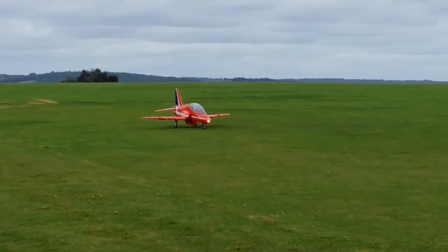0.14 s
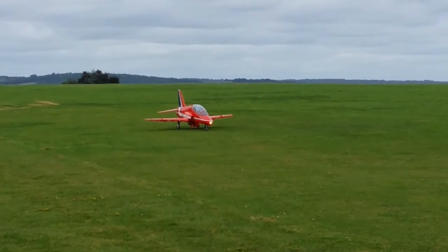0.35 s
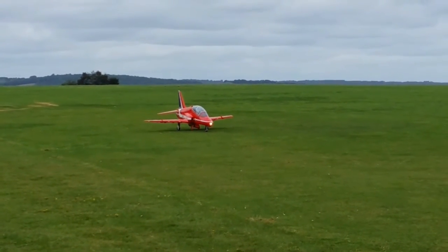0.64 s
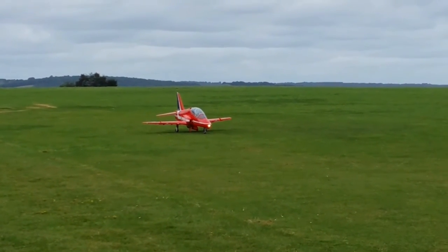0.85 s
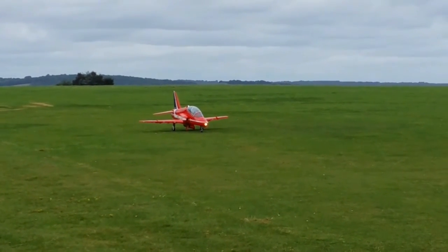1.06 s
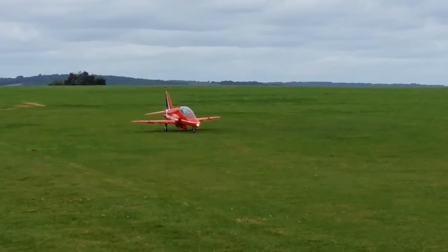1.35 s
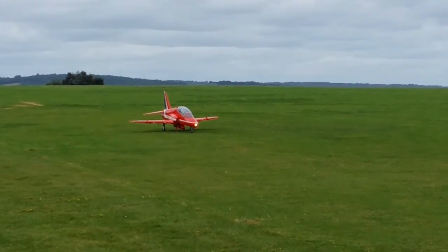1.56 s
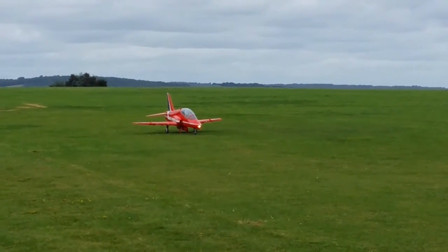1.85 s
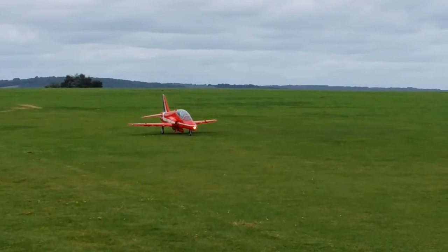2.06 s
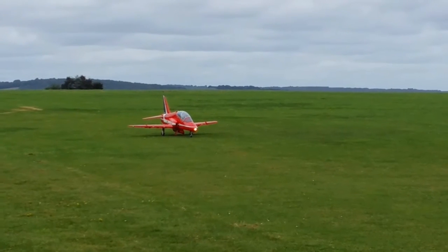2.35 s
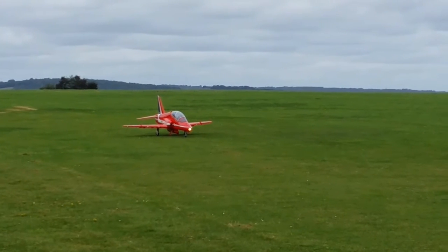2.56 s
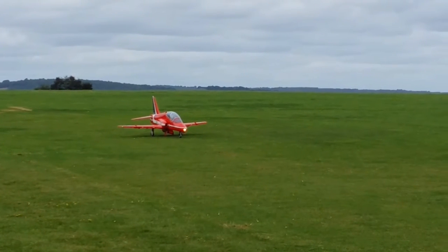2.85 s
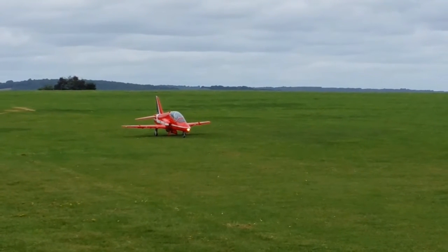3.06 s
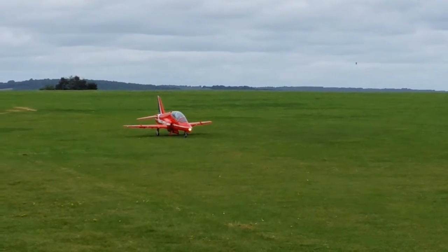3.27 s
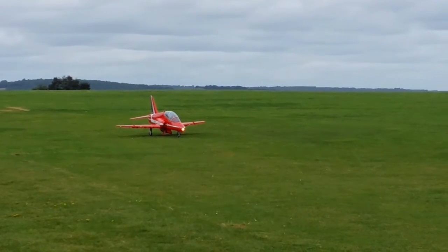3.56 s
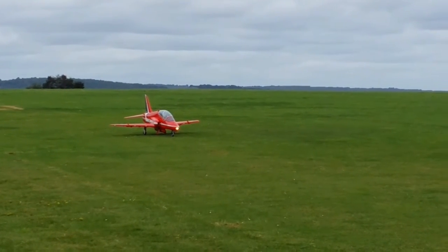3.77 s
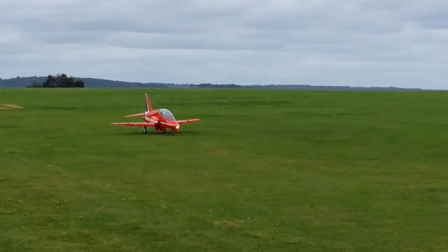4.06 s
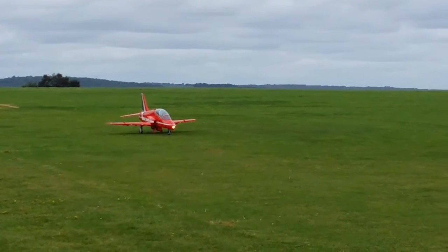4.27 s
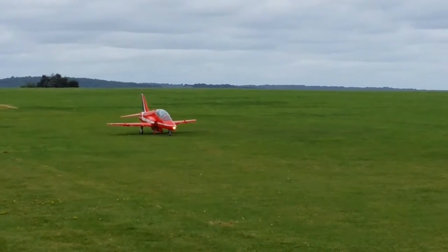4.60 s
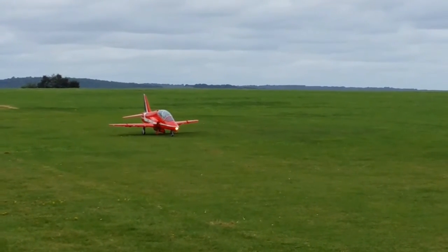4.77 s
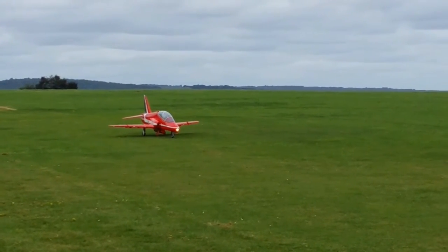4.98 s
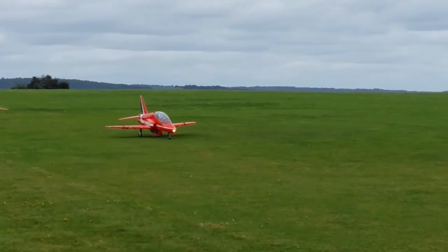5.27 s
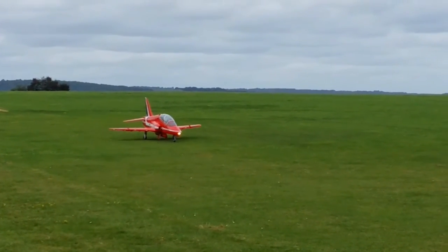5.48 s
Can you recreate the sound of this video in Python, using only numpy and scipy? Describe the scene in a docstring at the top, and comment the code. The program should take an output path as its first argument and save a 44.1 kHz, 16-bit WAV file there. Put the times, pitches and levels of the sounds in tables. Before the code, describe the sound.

A distant model-sized jet taxis on grass, heard through a hand-held stereo microphone. Steady airy exhaust hiss with faint rumble carries a piercing compressor whistle that shimmers in moving air. A tiny dropout comes before two seconds. The whistle glides upward, while wind knocks on left and right separately, worst around four seconds with crackling blasts. Then the wind calms and the whine slides down, briefly swelling before the end.

```python
"""On a grass field, a small turbine jet taxis far off, heard by two hand-held microphone ports.
Its compressor whistles (sine tones) and its exhaust hisses (coloured noise); both waver in the moving air.
A surface near the microphones sends a short echo. Wind thumps on each port (bursts of low noise).
The recorder limits the loudest thumps; its level cuts out once and ducks once after a loud thump."""
import sys
import numpy as np
from scipy import signal
from scipy.fft import rfft, irfft, next_fast_len
from scipy.io import wavfile
from scipy.ndimage import uniform_filter1d, minimum_filter1d, map_coordinates

SR = 44100
rng = np.random.default_rng(int(sys.argv[2]) if len(sys.argv) > 2 else 0)


def persist_wave(psi):
    """Save psi, clipped to +-1, as 16-bit WAV."""
    counts = np.round(np.clip(psi, -1, 1) * 32767).astype(np.int16)
    wavfile.write(sys.argv[1], SR, np.atleast_2d(counts).T)


N = 248724  # length in samples

# Wind level while a gust holds: (full-level start [s], hold [s], port [0 left, 1 right], level [dB])
GUST_EVENTS = [(1.02, 0.022, 0, -38.5), (1.37, .12, 1, -34.5), (1.52, .14, 1, -41), (2.2, 0.25, 1, -35),
               (2.494, 0.21, 0, -45), (2.58, 0.21, 1, -42), (2.9, .12, 1, -34.5), (2.924, .12, 0, -38),
               (3.06, 0.27, 1, -38), (3.3, 0.24, 0, -36.5), (3.46, 0.21, 1, -20.5), (3.723, .14, 0, -27.5),
               (3.73, .1, 1, -27.5), (3.941, 0.11, 0, -18.5), (4.1, 0.18, 0, -24), (4.1, 0.067, 1, -24),
               (4.262, 0.22, 0, -18), (4.33, 0.13, 1, -22), (4.55, 0.095, 1, -24.5),
               (4.477, 0.17, 0, -22.5), (4.74, 0.15, 0, -22.5), (4.828, 0.073, 1, -30.5),
               (5.52, .06, 1, -34)]
# Short wind thumps: (centre [s], port [0 left, 1 right], low part [dB], bright part against the low part [dB])
WIND_THUMPS = [(1.37, 1, -29.5, -29), (1.427, 1, -23, -42), (1.984, 0, -34.5, -18), (2.216, 1, -27.5, -37),
               (2.253, 1, -34, -25), (2.41, 1, -34, -20), (2.512, 0, -33.5, -22), (2.91, 1, -31, -23),
               (2.975, 1, -23, -23), (2.985, 0, -34, -23), (3.346, 0, -24, -33), (3.481, 1, -20, -32),
               (3.525, 0, -22.5, -14), (3.542, 1, -20, -16), (3.618, 1, -19, -22), (3.645, 1, -19, -18),
               (3.733, 1, -21, -29), (3.758, 0, -18.5, -2.5), (3.831, 1, -21, -4.5), (3.835, 0, -21.5, -21),
               (3.865, 1, -23, -21), (3.957, 0, -15, -8), (4.064, 0, -17.5, 2), (4.123, 0, -17, -12),
               (4.147, 1, -23, 1), (4.176, 1, -22.5, -28), (4.205, 0, -20, 6), (4.246, 1, -22, -24),
               (4.293, 0, -20, -10), (4.311, 0, -27, 5.5), (4.328, 0, -22, 4.5), (4.349, 0, -24, 6),
               (4.37, 0, -13.5, -8), (4.409, 0, -20, 1), (4.419, 1, -21, -10), (4.51, 0, -21.5, -9),
               (4.553, 1, -36, 1), (4.561, 0, -22.5, -4), (4.762, 0, -24.5, -7), (4.796, 0, -20, -7),
               (4.909, 0, -21.5, -12), (5.006, 0, -22, -16.5), (5.552, 1, -30.5, -27)]
# Colour of the low wind noise: (frequency [Hz], left [relative dB], right [relative dB])
THUD_COLOUR = [(20, -33, -23), (59, -9.5, -3), (118, -0.5, 3), (195, -1.5, -7), (350, -11.5, -22.5),
               (674, -50, -71)]
# Colour of the brighter wind noise: (frequency [Hz], left [relative dB], right [relative dB])
RASP_COLOUR = [(100, -32, -34), (302, 1.5, 2.5), (480, -0.5, -5.5), (890, -13.5, -28.5), (1540, -24, -33),
               (2510, -45, -73)]
CALM_DB, RISE_DB_PER_S, FALL_DB_PER_S = -65, 282, 171  # wind between gusts; how fast a gust comes and goes
THUMP_S, SNAP_S = 0.011, 0.0043  # half-widths of a thump's low and bright parts, where they fall to 1/e

# Exhaust loudness before it flutters: (time [s], hiss [dB], top hiss [dB])
EXHAUST_LEVEL = [(0.0, -31.5, -31.5), (0.32, -34, -33), (0.78, -30.5, -30.5), (0.98, -28.5, -26.5),
                 (1.7, -30.5, -25.5), (2.0, -32, -29), (2.24, -32, -27.5), (2.68, -32.5, -30),
                 (3.15, -29.5, -26.5), (3.41, -26.5, -23.5), (3.65, -30, -26), (3.85, -27.5, -26),
                 (4.22, -26.5, -28), (4.42, -30, -34), (4.71, -30.5, -29.5), (5.1, -31.5, -33.5),
                 (5.45, -28, -25), (5.64, -29.5, -24)]
# Exhaust rumble loudness: (time [s], level [dB])
RUMBLE_LEVEL_CURVE = [(0, -41), (1.6, -42), (2.1, -39), (4.1, -38), (4.35, -41), (5.2, -42.5), (5.5, -38.5)]
# Colour of the main hiss: (frequency [Hz], level [relative dB])
HISS_COLOUR = [(1800, -41), (2250, -19), (2500, -7.5), (2650, -5), (3100, 1), (4400, -1.5), (4650, -7),
               (5200, -2.5), (6800, -1), (7700, -0.5), (9000, -18)]
# Colour of the top hiss: (frequency [Hz], level [relative dB])
TOP_HISS_COLOUR = [(7000, -27.5), (7800, -1.5), (8700, -1.5), (9600, 2.5), (11000, -6), (12300, -1),
                   (13000, -15), (14200, -4.5), (15200, -29), (15500, -28)]
# Colour of the rumble: (frequency [Hz], level [relative dB])
RUMBLE_COLOUR = [(25, -21), (60, 1), (125, 3.5), (310, -1.5), (420, -6), (520, 2), (650, -3.5),
                 (1350, -4.5), (1600, -10), (2080, -7.5), (2260, -23.5), (2500, -16.5)]
# Exhaust at the left port against the right: (frequency [Hz], level [dB], phase [radians])
LEFT_PORT_RESPONSE = [(60, 2, 1.3), (316, -2.2, -0.74), (870, -1, -0.6), (2120, 3.5, 1), (2190, -5.5, 0),
                      (2990, 0.5, 0.5), (3450, -2.5, 1.53), (4050, 4, 0.65), (6300, 2, 0.46),
                      (7180, 4, -1.87), (8200, -19, -1.5), (9000, -11, 0.6), (10700, -7, 2), (12500, -7, 2),
                      (14900, -1, 2.5)]
# Near echo against the direct sound: (frequency [Hz], left [dB], right [dB], phase lead [turns])
ECHO_RESPONSE = [(300, -14, -11.5, 0.14), (504, -11, -8, 0.072), (1320, -8, -9, 0.094),
                 (2560, -41, -11, 0.35), (4040, -6, -2.5, 0.23), (6500, -15.5, -2, 0.53),
                 (7700, -36, -3.5, 0.26), (10100, -7, -3, 0.27), (11800, -6, -1.5, 1),
                 (14500, -6, -11, 0.28)]
ECHO_MS = 2.33  # echo delay, before the phase lead
# Scattered exhaust sound, unlike at both ports: (frequency [Hz], left [dB], right [dB])
SCATTER_RESPONSE = [(100, -18, -18), (1500, -5, -5), (2200, -5, -4), (2700, -16, -16), (3700, -3, -5),
                    (5000, -16, -16), (6300, -3, -5), (8100, -17, -4), (10500, -8, -4), (13000, -3, -1),
                    (15000, -3, -4)]
# A band of hiss: centre at idle, Hz gained per rotor Hz, random knots per second (width), level against top hiss
BAND_HZ, BAND_CLIMB, BAND_WIDTH_HZ, BAND_DB = 8900, 1.5, 450, -9.5

# Compressor speed before smoothing: (time [s], rotor tone [Hz])
ROTOR_SPEED = [(0.0, 2688.8), (0.4, 2691.7), (0.8, 2686.3), (1.1, 2687.9), (1.35, 2709.6), (1.6, 2745.5),
               (1.85, 2815.6), (2.1, 2875.8), (2.6, 2968), (3.1, 3085.1), (3.35, 3110.3), (3.8, 3134),
               (4.1, 3202.1), (4.6, 3383.6), (4.85, 3415.9), (5.1, 3399.4), (5.27, 3362), (5.42, 3293),
               (5.53, 3200), (5.63, 3090.3)]
IDLE_HZ = 2690  # rotor tone at the lowest speed
BLADE_TONE_MULTIPLE = 4  # the high whistle (blade tone) is four times the lower (rotor) tone
# Blade tone, swelling and fading as eddies cross the path: (time [s], level at the right port [dB])
BLADE_LEVEL = [(0, -27.5), (.33, -32), (.43, -24), (.55, -31), (.68, -21.5), (.8, -26), (.95, -23),
               (1.3, -22), (1.62, -23), (1.75, -37), (1.87, -27), (2.12, -35), (2.24, -19.5), (2.62, -18),
               (2.75, -31.5), (3.0, -20.5), (3.07, -30), (3.2, -22.5), (3.9, -21), (4.15, -27.5),
               (4.42, -37), (4.58, -26), (4.7, -35), (4.95, -37), (5.3, -26), (5.49, -33), (5.57, -17.5),
               (5.64, -23)]
# How far the left port leads in the blade tone: (time [s], phase [radians])
BLADE_PHASE_LEAD = [(0, 0.42), (1.1, 2.1), (2.2, 0.52), (3.6, 2.5), (4.1, 1.5)]
# Blade tone at the left port against the right: (blade tone [Hz], level [dB])
BLADE_LEFT_LEVEL = [(10700, -8), (12500, -6), (13400, -4.5)]
# Rotor tone, ringing out near one speed: (rotor tone [Hz], level [dB])
ROTOR_RESONANCE = [(2690, -44), (2740, -40.5), (2900, -45.5), (3070, -50), (3125, -38.5), (3200, -37),
                   (3300, -62), (3420, -61)]

# Moments when the recorder's level falls suddenly and recovers: (start [s], level left at the start [share])
RECORDER_DIPS = [(1.695, 0.037), (4.21, 0.32)]
TOP_HZ = 15600  # nothing is kept above this


def amp(db):
    """Gain of a level in dB."""
    return 10 ** (np.asarray(db) / 20)


def unit(x):
    """Scale x to rms 1."""
    return x / np.sqrt(np.mean(x ** 2) + 1e-20)


def along(points, hz):
    """Read each column of (Hz, value, ..) points at hz, on a log axis."""
    f, *columns = np.transpose(points)
    return np.array([np.interp(np.log(hz + 1), np.log(f + 1), c) for c in columns])


def curves(rows):
    """One value per sample for each column after the time."""
    s, *columns = np.transpose(rows)
    return np.array([np.interp(np.arange(N) / SR, s, c) for c in columns])


def wobble(rate):
    """A smooth random curve with rate knots a second."""
    knots = rng.standard_normal(int(N * rate / SR) + 4)
    return map_coordinates(knots, [np.arange(N) * rate / SR])


def wobble_pair(rate):
    """A separate random curve for each port."""
    return np.array([wobble(rate), wobble(rate)])


def filtered(x, response):
    """Multiply the spectrum of x by a complex response of frequency."""
    m = next_fast_len(N + SR // 4)
    return irfft(rfft(x, m) * response(np.fft.rfftfreq(m, 1 / SR)), m)[..., :N]


def noise(spectrum, channels):
    """Coloured noise of rms 1."""
    white = rng.standard_normal((channels, N))
    return unit(filtered(white, lambda hz: amp(along(spectrum, hz))))


def gusts():
    """Wind level in dB at each port: every gust rises, holds and falls back to the calm."""
    t = np.arange(N) / SR
    level_db = np.full((2, N), float(CALM_DB))
    for s, hold, port, db in GUST_EVENTS:
        rise_db = RISE_DB_PER_S * np.maximum(s - t, 0)
        fall_db = FALL_DB_PER_S * np.maximum(t - s - hold, 0)
        level_db[round(port)] = np.maximum(level_db[round(port)], db - rise_db - fall_db)
    return level_db


def buffeting():
    """Lumpy wind noise, unrelated from port to port; stronger flow is brighter."""
    level_db = gusts() + 2.6 * wobble_pair(35)
    # The rasp grows faster than the thud as the wind gets stronger.
    rasp_db = 1.534 * level_db + 4.4 * wobble_pair(130) + 1.5
    thud = noise(THUD_COLOUR, channels=2)
    rasp = noise(RASP_COLOUR, channels=2)
    return amp(level_db) * thud + amp(rasp_db) * rasp


def thumps():
    """Each thump is a bell-shaped burst of low noise with a shorter, brighter burst at its centre."""
    out = np.zeros((2, N))
    thud = noise(THUD_COLOUR, channels=2)
    rasp = noise(RASP_COLOUR, channels=2)
    t = np.arange(-1500, 1500)
    for s, port, db, bright_db in WIND_THUMPS:
        port = round(port)
        at = round(s * SR) + t
        low = unit(np.exp(-(t / SR / THUMP_S) ** 2) * thud[port, at])
        bright = unit(np.exp(-(t / SR / SNAP_S) ** 2) * rasp[port, at])
        out[port, at] += amp(db) * (low + amp(bright_db) * bright)
    return out


def wind():
    """Moving air makes noise at each port: lumpy buffeting plus short thumps."""
    return buffeting() + thumps()


def rotor_speed():
    """Rotor tone in Hz; the rotor's inertia rounds its speed changes."""
    return uniform_filter1d(curves(ROTOR_SPEED)[0], size=6000, mode="nearest")


def climbing_band():
    """A fuzzy band of hiss of rms 1 that climbs as the rotor speeds up."""
    centre_hz = BAND_HZ + BAND_CLIMB * (rotor_speed() - IDLE_HZ)
    phase = 2 * np.pi * np.cumsum(centre_hz) / SR
    return unit(wobble(BAND_WIDTH_HZ) * np.sin(phase) + wobble(BAND_WIDTH_HZ) * np.cos(phase))


def through_air(x, patchy_db):
    """Eddies on the long path raise and lower patches of the spectrum."""
    z = signal.stft(x, nperseg=512)[2]
    field = rng.standard_normal(z.shape[1:])
    field = uniform_filter1d(field, size=14, axis=0)  # smooth over frequency
    field = uniform_filter1d(field, size=12, axis=1)  # smooth over time
    return signal.istft(z * amp(patchy_db * unit(field)), nperseg=512)[1][:, :N]


def ports_with_echo(hz):
    """Colour of each port times the comb made by direct sound and its near echo."""
    db, radians = along(LEFT_PORT_RESPONSE, hz)
    *echo_db, lead = along(ECHO_RESPONSE, hz)
    echo_turns = hz * ECHO_MS / 1000 - lead
    comb = 1 + amp(echo_db) * np.exp(-2j * np.pi * echo_turns)
    left = amp(db) * np.exp(1j * radians)
    return comb * np.array([left, np.ones_like(hz)])


def exhaust():
    """Jet noise reaches both ports directly, by the near echo and by scattering."""
    hiss_db, top_db = curves(EXHAUST_LEVEL)
    flutter_db = 0.5 * wobble(12)
    top_flutter_db = 1.8 * flutter_db + 0.53 * wobble(24.8)
    hiss = amp(hiss_db + flutter_db) * noise(HISS_COLOUR, channels=3)
    band = np.array([climbing_band() for _ in range(3)])
    top = noise(TOP_HISS_COLOUR, channels=3) + amp(BAND_DB) * band
    top = amp(top_db + top_flutter_db) * top
    rumble = amp(curves(RUMBLE_LEVEL_CURVE)) * noise(RUMBLE_COLOUR, channels=3)
    jet = through_air(hiss + top + rumble, patchy_db=0.93)
    # One noise is shared by both ports; the other two are scattered, one to each port.
    shared = filtered(jet[0], ports_with_echo)
    scattered = filtered(jet[1:], lambda hz: amp(along(SCATTER_RESPONSE, hz)))
    return shared + scattered


def blade_tone(rotor_hz, phase):
    """The high whistle of the compressor; turbulence smears it into a skirt of noise."""
    blade_phase = BLADE_TONE_MULTIPLE * phase
    drift = 0.25 * wobble(50) + np.array([[.5], [-.5]]) * curves(BLADE_PHASE_LEAD)
    flutter_db = 2.16 * wobble(60) + 1.0 * wobble_pair(40)
    fading_db = 1.96 * wobble(9) + 0.66 * np.array([wobble(5.6), wobble(16)])
    left_only = np.array([[1], [0]])
    level_db = curves(BLADE_LEVEL) + left_only * along(BLADE_LEFT_LEVEL, BLADE_TONE_MULTIPLE * rotor_hz)
    skirt = wobble(700) * np.sin(blade_phase) + wobble(650) * np.cos(blade_phase)
    tone = np.sin(blade_phase + drift) + amp(-16.5) * skirt
    return amp(level_db + fading_db + flutter_db) * tone


def rotor_tone(rotor_hz, phase):
    """The weak tone below the blade tone, loudest where the rotor speed makes it ring."""
    level_db = along(ROTOR_RESONANCE, rotor_hz) + 0.99 * wobble(20)
    return amp(level_db) * np.sin(phase + 0.45 * wobble(40))


def whistle():
    """The compressor's blade and rotor tones follow the same rotor speed."""
    rotor_hz = rotor_speed()
    phase = 2 * np.pi * np.cumsum(rotor_hz) / SR
    # A sine of peak sqrt(2) has rms 1.
    return np.sqrt(2) * (blade_tone(rotor_hz, phase) + rotor_tone(rotor_hz, phase))


def scene():
    """Wind and the jet's exhaust and whistle, added together."""
    return wind() + exhaust() + whistle()


def record(dry):
    """A limiter shared by both channels, sudden level dips that recover, and the band limit."""
    needed = np.minimum(1, .99 / (np.abs(dry).max(axis=0) + 1e-9))
    # The gain is held down around each peak, mostly after it, then smoothed.
    held = minimum_filter1d(needed, size=500, origin=150)
    gain = uniform_filter1d(held, size=200)
    for s, share in RECORDER_DIPS:
        since = np.arange(N) / SR - s
        recovery = np.clip(share + since / 0.02, 0, 1)
        gain = gain * np.where(since < 0, 1, recovery)
    return filtered(dry * gain, lambda hz: hz < TOP_HZ)


dry = scene()
out = record(dry)
persist_wave(out)
```